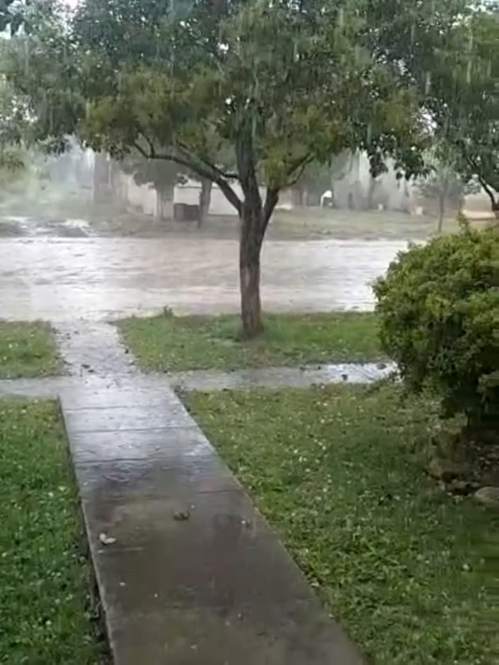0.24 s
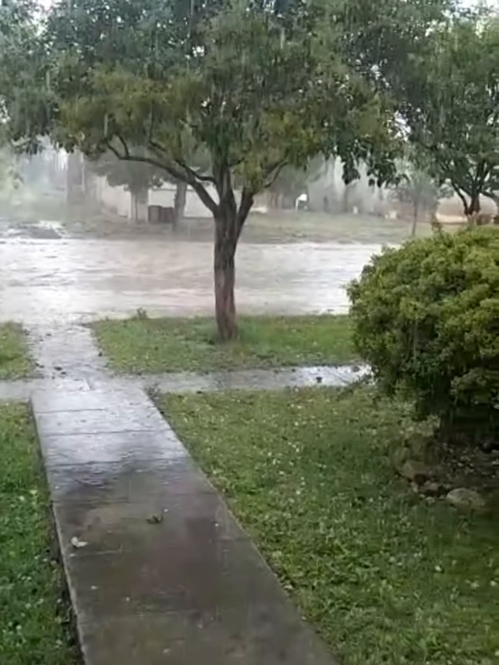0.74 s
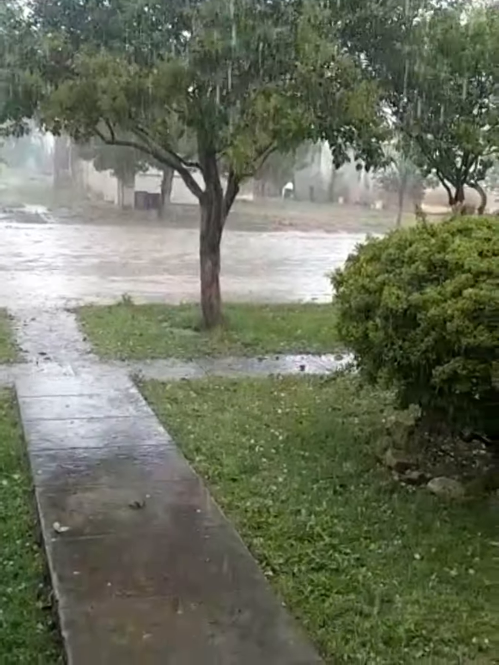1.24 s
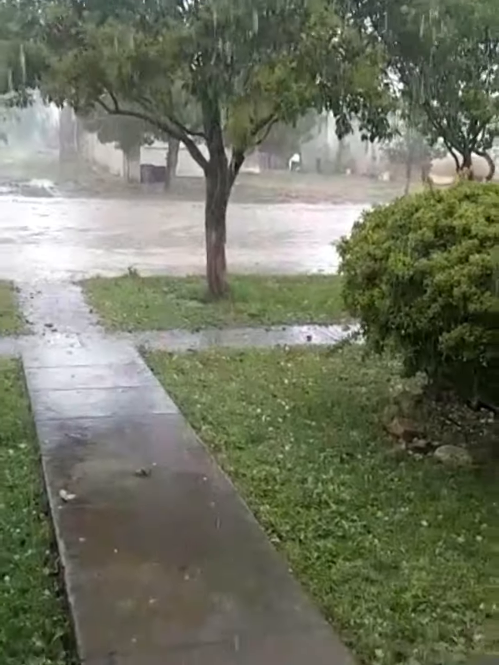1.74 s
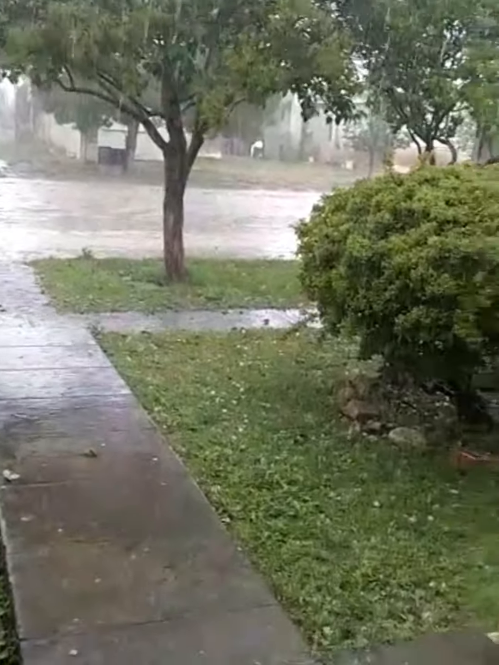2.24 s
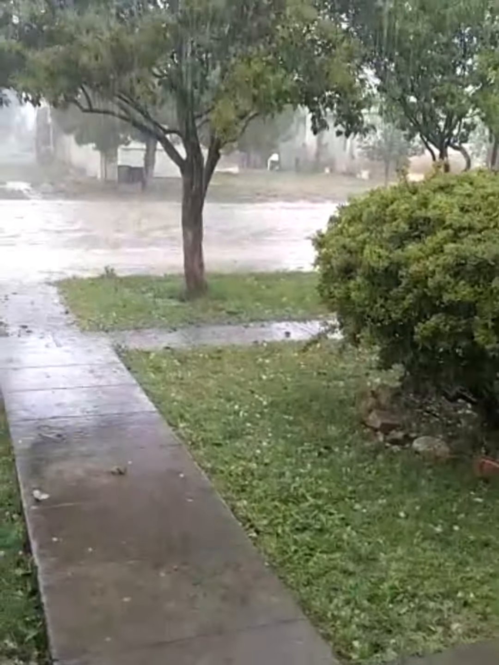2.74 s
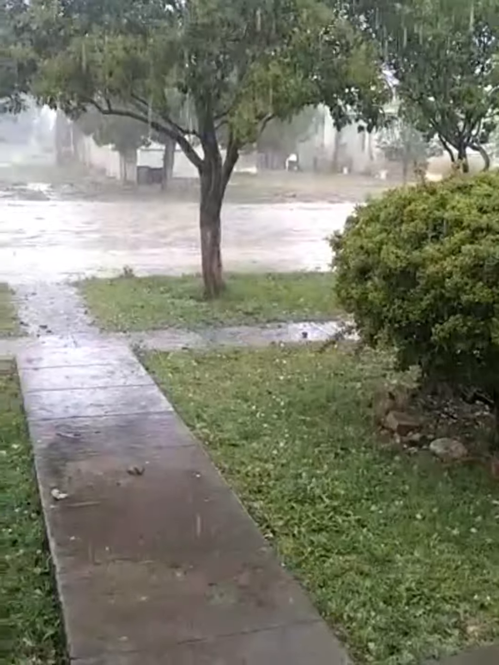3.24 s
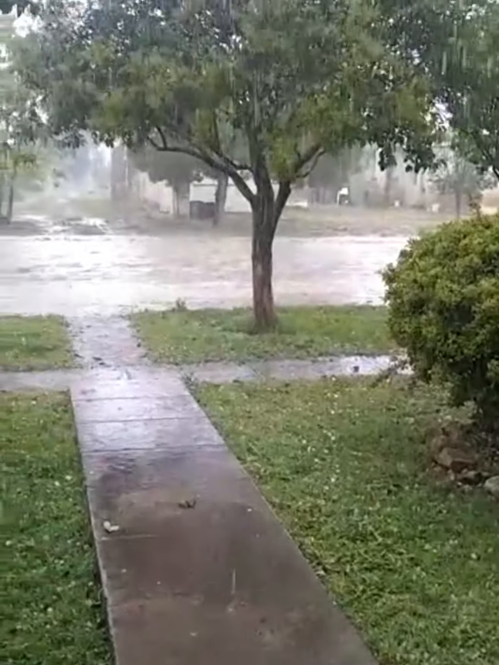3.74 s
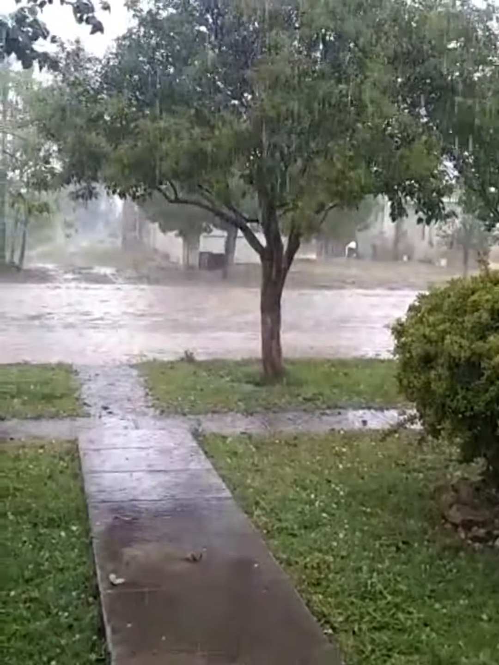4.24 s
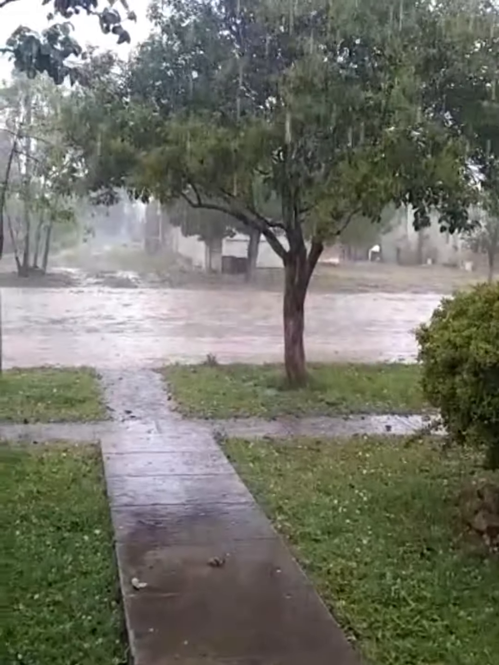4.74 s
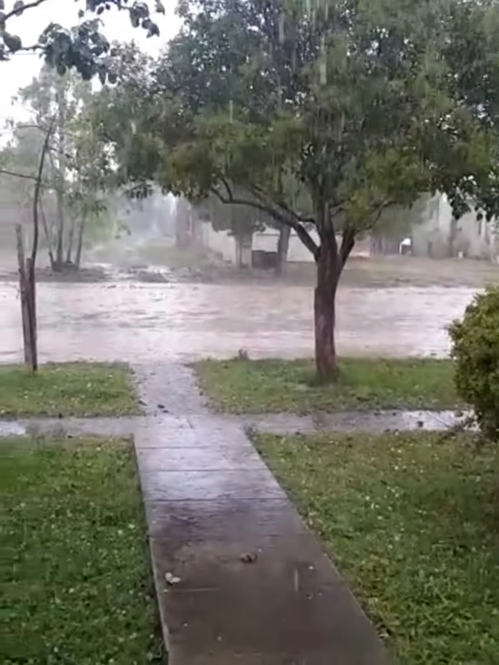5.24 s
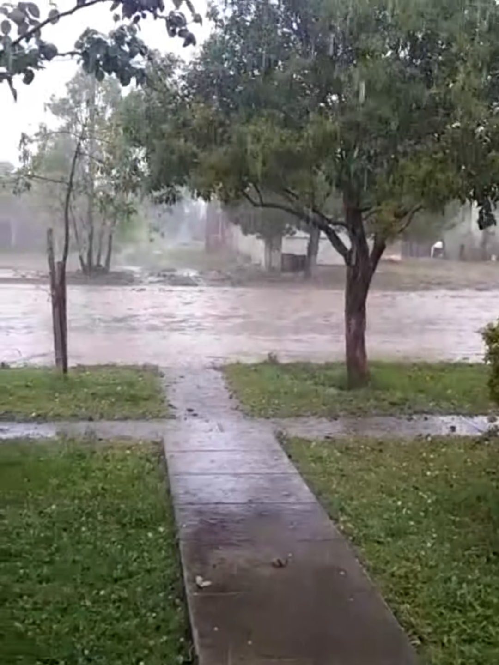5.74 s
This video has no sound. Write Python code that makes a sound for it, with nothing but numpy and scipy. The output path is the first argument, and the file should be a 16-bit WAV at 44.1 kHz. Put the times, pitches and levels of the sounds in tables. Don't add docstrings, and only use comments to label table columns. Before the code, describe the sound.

A dense, gusty downpour roars and hisses outdoors while scattered hailstones tick and snap close by, two hits standing out hard.

```python
import sys
import numpy as np
from scipy import signal
from scipy.fft import rfft, irfft, next_fast_len
from scipy.io import wavfile
from scipy.ndimage import uniform_filter1d

SR = 44100
rng = np.random.default_rng(int(sys.argv[2]) if len(sys.argv) > 2 else 0)


def store_wav(level_fs):
    pcm = np.round(np.clip(np.atleast_2d(level_fs), -1, 1) * 32767)
    wavfile.write(sys.argv[1], SR, pcm.T.astype(np.int16))


def volts_from_db(level):
    exponent = np.asarray(level, float) / 20
    return 10 ** exponent


N = 263277

# time_s, level_db
DOWNPOUR = [(0, -1.5), (.6, -0.63), (1.1, 0.46), (1.9, 0.2), (2.5, 2), (3.0, 0), (3.5, 2.3), (4.1, -1.85),
            (4.4, -2), (5.0, 0.4), (5.5, -0.1), (5.97, -2.5)]
# peak_s, length_s, roar_db, hiss_db
SHEETS = [(0.024, 0.011, -2, 5), (0.122, 0.04, 0, 2), (0.224, 0.077, 2, 2), (0.38, .05, 2.5, 4),
          (0.493, 0.083, 2, 3), (0.613, 0.017, 1, .6), (0.75, 0.1, 0.1, 3.5), (1.0, 0.045, .6, 1.5),
          (1.21, 0.041, -0.8, 2.2), (1.397, 0.024, -1.5, 3), (1.74, 0.064, 1, 5), (1.815, 0.019, 6, 2),
          (2.04, 0.04, 4, 3), (2.419, 0.049, 1.5, 3), (3.08, 0.067, 3, 2.5), (3.248, .04, 4, 1.5),
          (3.49, 0.099, 2, 2.5), (3.656, 0.015, -0.5, 2.5), (3.79, 0.053, 2, 6.5), (3.928, 0.037, 4, 5.5),
          (4.009, .06, 5, 7), (4.218, 0.1, 3, 4), (4.503, 0.078, 3, 5.5), (4.63, 0.071, -0.5, 3.5),
          (5.034, 0.036, 1, 3.5), (5.142, 0.018, 1, 3), (5.245, 0.038, 4, 5), (5.303, 0.049, 2, 9.5),
          (5.61, 0.057, 3, 6.5), (5.692, 0.018, -2, 4)]
# freq_hz, level_db (per Hz)
RAIN_COLOUR = [(25, -80), (70, -62), (100, -61), (130, -60), (170, -54.5), (350, -55.5), (620, -58.5),
               (850, -53.5), (1100, -58.5), (2000, -58), (4000, -62), (7000, -64.5), (10000, -69.5),
               (14000, -75.5)]
# centre_hz, width_hz, boost_db
GUTTER = [(220, 5, 4.5), (605, 20, 3), (619.5, 68, 5), (800, 5.5, -3)]
# freq_hz, left_first_share, diffuse_share, left_minus_right_db
FIELD = [(100, 0.14, 0.021, -2), (300, 1, 0.12, 0), (420, 0.16, 0.031, 0), (1100, 0.62, 0.0055, -0.5),
         (1750, 0.57, 0.0097, 4.5), (2310, 0.37, 0.0013, -2.5), (2780, 0.49, 0.0032, -4),
         (3400, 0.52, 0.039, -0.5), (4270, 1, 0.22, -0.5), (5630, 0.49, 0.47, 0), (7400, 1, 0.45, -3),
         (8300, 0.73, 0.14, -4.5), (11600, 0.65, 0.44, -3), (13500, 0.72, 0.81, -1)]
# start_s, peak_db, ring_hz
STONES = [
    (.1153, -8, 4300),
    (.3463, -10, 5000),
    (.607, -9, 4000),
    (.7555, -11, 3500),
    (1.2410, -6.5, 5400),
    (2.5929, -1.5, 5000),
    (2.5985, -13, 5600),
    (2.6002, -15, 5800),
    (4.6321, -2, 3300),
]
# start_s, peak_db, ring_hz
HAIL = [
    (0.0194, -19, 7600),
    (0.857, -23, 3060),
    (1.3854, -22, 3690),
    (1.6494, -35, 3290),
    (3.0906, -15, 4000),
    (3.24, -26, 3560),
    (3.7439, -14.5, 3850),
    (4.005, -24, 5700),
    (5.225, -24, 3540),
]
# start_s, level_db, centre_hz, width_hz, decay_s
SPLASH = [(.115, -26, 4200, 1500, 0.0096), (0.607, -24, 4000, 1500, 0.009), (.68, -31, 8850, 900, 0.013),
          (.752, -23, 3400, 904, 0.016), (1.24, -28, 5200, 2500, 0.027), (1.812, -26, 5000, 4000, 0.033),
          (1.99, -29.5, 4000, 2500, 0.084), (2.166, -25, 3500, 1500, 0.011),
          (2.334, -25.5, 3000, 1500, 0.0075), (2.598, -30, 5000, 3000, 0.041),
          (3.07, -43, 5000, 4000, 0.028), (3.492, -28, 3200, 1500, 0.024), (3.763, -28, 6200, 300, .02),
          (3.913, -32, 2700, 300, 0.034), (4.216, -26, 5690, 220, .022), (4.623, -26, 3500, 3000, 0.0068),
          (5.298, -32, 1520, 60, .03), (5.291, -29, 886, 80, 0.092), (5.585, -26, 874, 40, 0.077),
          (5.6, -25, 580, 260, 0.048), (5.6, -32, 5600, 199, 0.045), (5.685, -40, 6000, 2500, 0.013),
          (5.686, -27.5, 2450, 100, 0.029)]
# start_s, level_db, pitch_hz, decay_s
HUM = [
    (5.24, -34, 516, 0.35),
    (5.26, -35, 843, 0.4),
    (5.58, -30.5, 890.5, 0.24),
    (5.59, -29.5, 512, 0.063),
]
# freq_hz, side_minus_mid_db
BASS_SIDE = [(45, 13), (90, 5.5), (125, 0), (190, -10.5), (260, -5), (400, 3), (520, -6.5), (900, -14),
             (1125, -16)]
# start_s, depth_db
DUCKS = [
    (.135, 1.5),
    (1.25, 4.5),
    (2.592, 8.5),
    (4.633, 6),
    (5.69, 2.5),
]

PORT_LAG_S = 0.0004398
ROAR_DB, HISS_DB = -0.3, -2.07


def rain():
    size = next_fast_len(N + 4096)
    hz = np.arange(size // 2 + 1) * SR / size
    fields = gusts(drops(per_s=900, spread_db=3.8, share=0.14), patchy_db=0.98, flutter_db=1.09)
    left, right, round_l, round_r = rfft(fields, size)

    colour_db = at_hz(RAIN_COLOUR, hz)[0]
    for centre_hz, width_hz, boost_db in GUTTER:
        colour_db = colour_db + boost_db / (1 + (2 * (hz - centre_hz) / width_hz) ** 2)

    first, diffuse, pan_db = at_hz(FIELD, hz)
    first, diffuse = np.clip(first, 0, 1), np.clip(diffuse, 0, 1)
    left = left * np.sqrt(first * (1 - diffuse))
    right = right * np.sqrt((1 - first) * (1 - diffuse))

    half = np.exp(0.5j * port_turn(hz))
    left_port = left * half + right / half + round_l * np.sqrt(diffuse)
    right_port = left / half + right * half + round_r * np.sqrt(diffuse)
    gain_db = colour_db + pan_db / 2 * np.array([[1], [-1]])
    return irfft(np.array([left_port, right_port]) * np.sqrt(SR / 2) * volts_from_db(gain_db), size)[:, :N]


def drops(per_s, spread_db, share):
    size_db = spread_db * np.minimum(rng.exponential(1, (4, N)), 5)
    size = volts_from_db(size_db) * rng.choice([-1, 1], (4, N))
    near = size * (rng.random((4, N)) < per_s / SR)
    far = rng.standard_normal((4, N))
    return np.sqrt(1 - share) * far + np.sqrt(share) * near / near.std()


def gusts(fields, patchy_db, flutter_db):
    hz, s, cells = signal.stft(fields, SR, nperseg=256)
    hz = hz[:, None]
    (slow_db,) = in_time(DOWNPOUR, s)
    sheet_roar_db, sheet_hiss_db = sheets_db(s)

    deep = np.clip(np.log2(700 / (hz + 1)) / 4.1, 0, 1)
    roar_db = ROAR_DB + slow_db + (1 - deep) * sheet_roar_db
    hiss_db = HISS_DB + 1.04 * slow_db + sheet_hiss_db

    bright = np.clip(np.log2((hz + 1) / 1100) / 1.9, 0, 1)
    gain_db = (1 - bright) * roar_db + bright * hiss_db + duck_db(s)
    gain_db = gain_db + patchy_db * drift(gain_db.shape, 13, 11)
    gain_db = gain_db + flutter_db * bright * drift(gain_db.shape, 91, 3.8)
    cells[2:] *= volts_from_db(1.95 * drift(gain_db.shape, 6, 25))
    return signal.istft(cells * volts_from_db(gain_db), SR, nperseg=256)[1][:, :N]


def sheets_db(s):
    peak_s, length_s, *levels_db = np.transpose(SHEETS)
    away = (s - peak_s[:, None]) / length_s[:, None]
    away = np.where(away < 0, away / 0.72, away)
    return np.array(levels_db) @ np.exp(-away ** 2)


def hail():
    out, t = np.zeros(N + 400), np.arange(400) / SR
    rise_s = 0.00016
    small = [(s + 0.00097, db + 11.0, hz) for s, db, hz in HAIL]
    for start_s, peak_db, ring_hz in STONES + small:
        swell = (t / rise_s) ** 2 * np.exp(2 - 2 * t / rise_s)
        tick = np.sin(2 * np.pi * ring_hz * t) * swell
        tick[6:9] += np.array([0.3, -0.75, 0.2])
        tick[21:] += 0.55 * tick[:-21]
        out[round(start_s * SR):][:400] += volts_from_db(peak_db) * tick
    return out[:N]


def splashes():
    length = 16000
    out, t = np.zeros(N + length), np.arange(length) / SR
    sprays = rng.standard_normal((len(SPLASH), length))
    for (start_s, level_db, centre_hz, width_hz, decay_s), spray in zip(SPLASH, sprays):
        band = resonance(spray, centre_hz, width_hz)
        swell = 2 * (1 - np.exp(-t / (0.033 * decay_s))) * np.exp(-t / decay_s)
        out[round(start_s * SR):][:length] += volts_from_db(level_db) * band / band.std() * swell
    return out[:N]


def hum():
    out = 0
    for start_s, level_db, pitch_hz, decay_s in HUM:
        t = np.maximum(np.arange(N) / SR - start_s, 0)
        wobble_db, bend = np.repeat(drift((2, N // 100 + 1), 1, 9), 100, axis=1)[:, :N]
        turn = 2 * np.pi * np.cumsum(pitch_hz + 4 * bend) / SR
        pair = np.sin(turn) + 0.2 * np.sin(1.2 * turn)
        broken = uniform_filter1d(volts_from_db(2 * wobble_db), size=200)
        swell = (1 - np.exp(-t / 0.0087)) * np.exp(-t / decay_s)
        out = out + 2 * volts_from_db(level_db) * swell * pair * broken
    return out


def resonance(x, hz, width_hz):
    r = np.exp(-np.pi * width_hz / SR)
    side = (1 - r * r) / 2
    return signal.lfilter([side, 0, -side], [1, -2 * r * np.cos(2 * np.pi * hz / SR), r * r], x)


def drift(shape, band_span, frame_span):
    slow = rng.standard_normal(shape)
    for _ in range(2):
        slow = uniform_filter1d(slow, max(1, int(band_span)), axis=0)
        slow = uniform_filter1d(slow, max(1, int(frame_span)), axis=1)
    return slow / slow.std()


def in_time(rows, s):
    at, *columns = np.transpose(rows)
    return [np.interp(s, at, c) for c in columns]


def at_hz(rows, hz):
    at, *columns = np.transpose(rows)
    return [np.interp(np.log(hz + 1), np.log(at), c) for c in columns]


def port_turn(hz):
    bass = -2 * np.arctan(volts_from_db(at_hz(BASS_SIDE, hz)[0]))
    lagged = 2 * np.pi * hz * PORT_LAG_S - np.pi
    return np.where(hz < 0.5 / PORT_LAG_S, bass, lagged)


def duck_db(s):
    attack_s, hold_s, release_s = 0.005, 0.2, 0.46
    start_s, depth_db = np.transpose(DUCKS)
    since = np.maximum(s - start_s[:, None], 0)
    shape = (1 - np.exp(-since / attack_s)) * np.exp(-(since / (hold_s + release_s)) ** 1.36)
    return -depth_db @ shape


def scene():
    size = next_fast_len(N + 4096)
    hz = np.arange(size // 2 + 1) * SR / size
    far = rain()
    near = hail() + splashes() + hum()
    late = irfft(rfft(near, size) * np.exp(-1j * port_turn(hz)), size)[:N]
    return far + np.array([near, late])


def joint_treble(x, wander_db, apart):
    window, lead = signal.windows.kaiser_bessel_derived(2048, 4 * np.pi), 415
    padded = np.pad(x, ((0, 0), (lead, 0)))
    hz, s, (left, right) = signal.stft(padded, SR, window, nperseg=2048)
    band = (hz // 600).astype(int)
    shape = (band[-1] + 1, len(s))
    hz = hz[:, None]

    wander = 1.3 * drift(shape, 8, 3.3) + 1.1 * drift(shape, 1, 1.8)
    pan_db = 0.75 * at_hz(FIELD, hz)[2] + wander_db * wander[band]
    step_db = 1.5 * np.round(pan_db / 1.5)

    hard_hit = uniform_filter1d(1.0 * (abs(padded[0]) > 0.5), size=2048)[::1024] > 1e-6
    hard_hit = np.pad(hard_hit, (0, len(s)))[:len(s)]
    strays = drift(shape, 1, 2)[band] > apart - 1.3 * (hz > 11600)
    kept = strays | (hz < 6290) | hard_hit

    usual = uniform_filter1d(uniform_filter1d(abs(left), size=60, axis=0), size=3, axis=1)
    coarse = np.clip((hz - 5000) / 8000, 0, 1.2) * volts_from_db(3 * drift(shape, 1, 1)[band])
    left, right = [np.where((abs(c) < coarse * usual) & ~hard_hit, 0, c) for c in (left, right)]

    limit = 9 - 6.6 * (hz > 9000) - 0.7 * (hz > 11400) - 1.1 * (hz > 13800)
    starved = drift(shape, 1, 1)[band] > limit
    left, right = left * ~starved, right * ~starved

    joined = np.where(kept, right, left * volts_from_db(-step_db))
    return signal.istft(np.array([left, joined]), SR, window, nperseg=2048)[1][:, lead:lead + N]


def roll_off(x):
    return signal.sosfilt(signal.butter(12, 14300, fs=SR, output="sos"), x)


def record(dry):
    dry = signal.sosfilt(signal.butter(12, 14500, fs=SR, output="sos"), dry)
    limited = 1.495 * np.tanh(dry / 1.493)
    mix = joint_treble(limited, wander_db=0.4, apart=1.6)
    return roll_off(mix)


dry = scene()
out = record(dry)
store_wav(out)
```